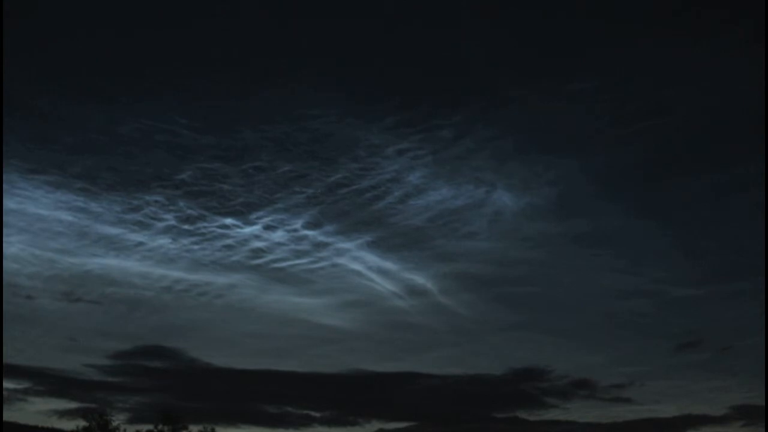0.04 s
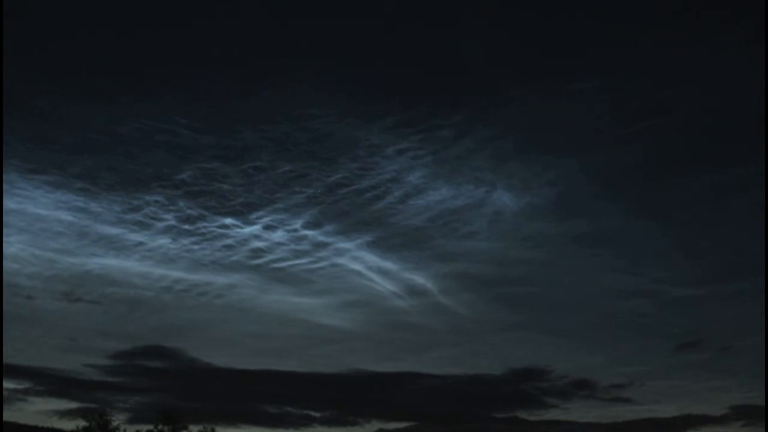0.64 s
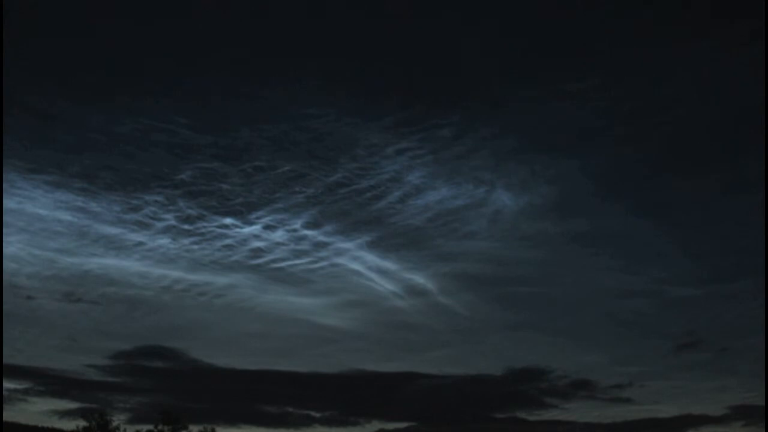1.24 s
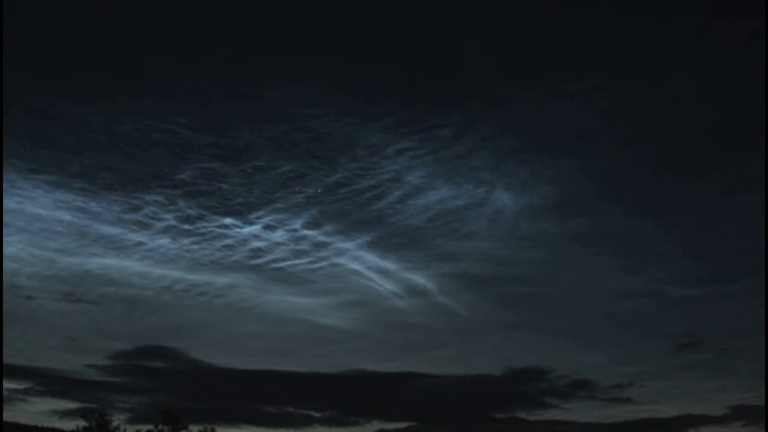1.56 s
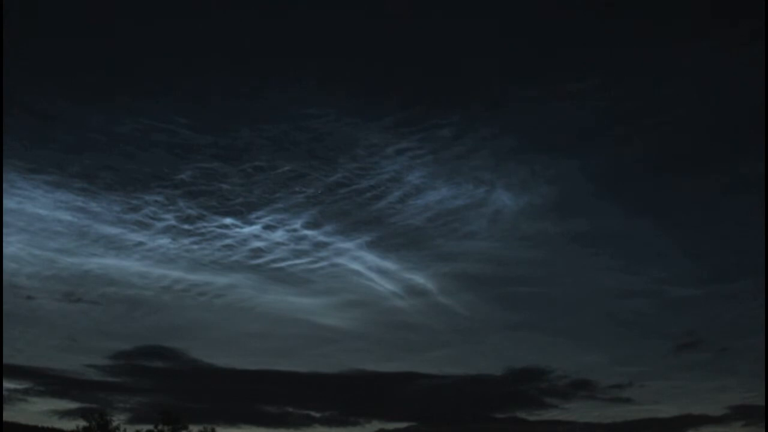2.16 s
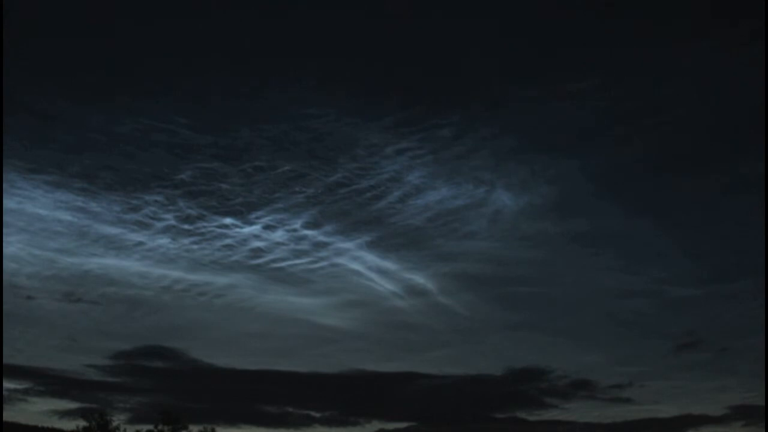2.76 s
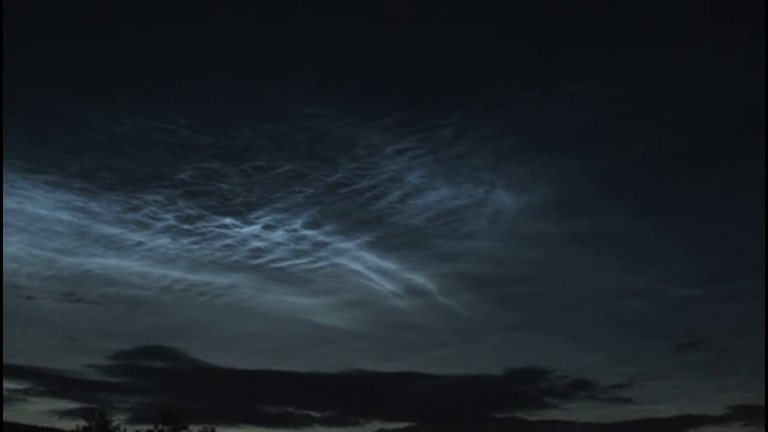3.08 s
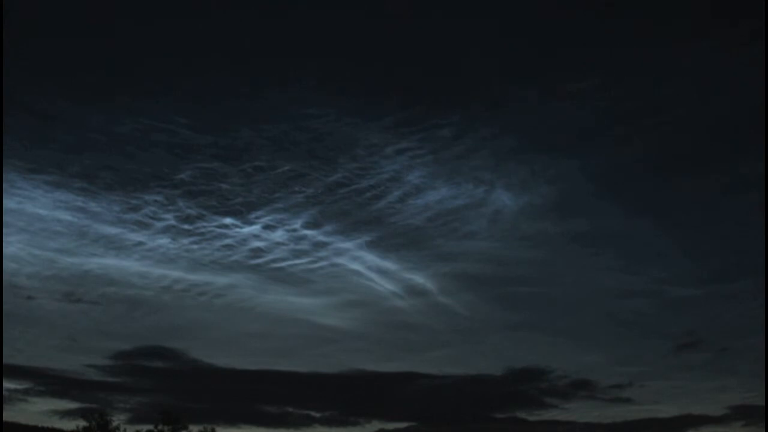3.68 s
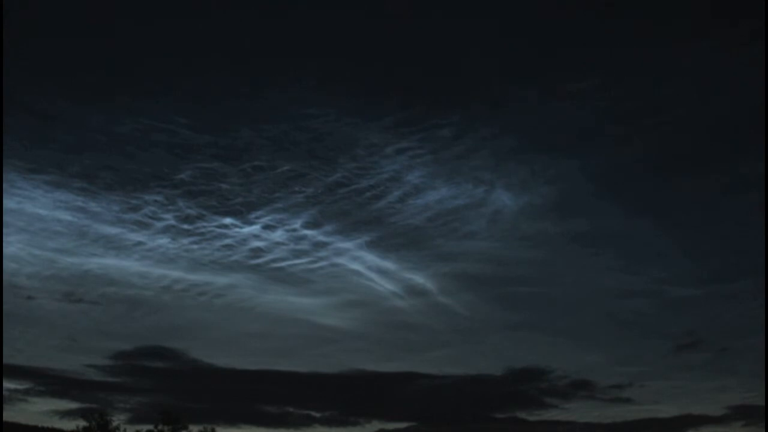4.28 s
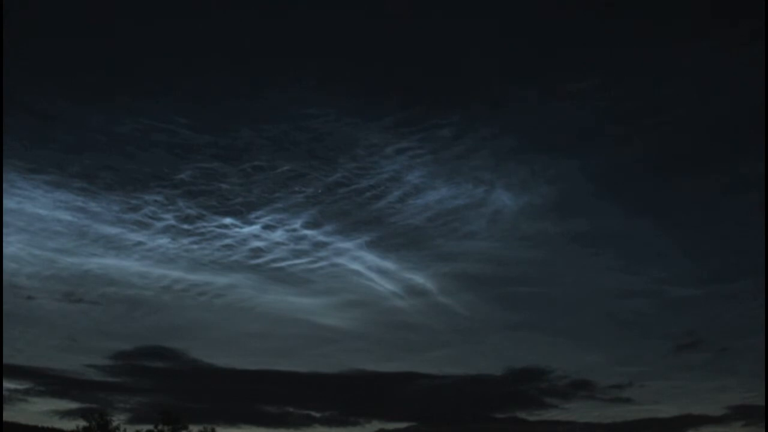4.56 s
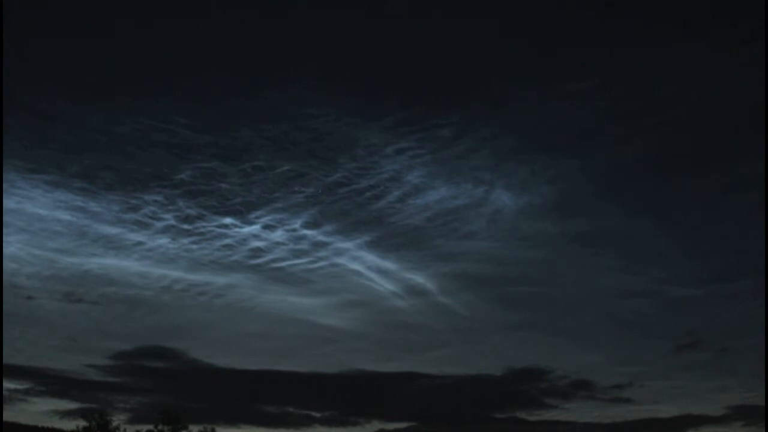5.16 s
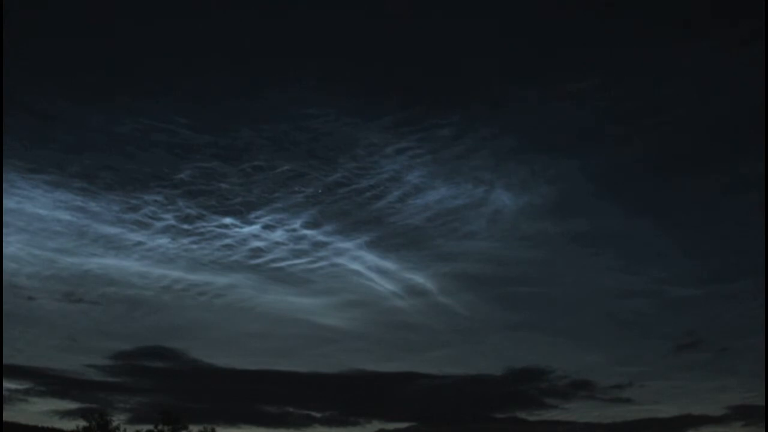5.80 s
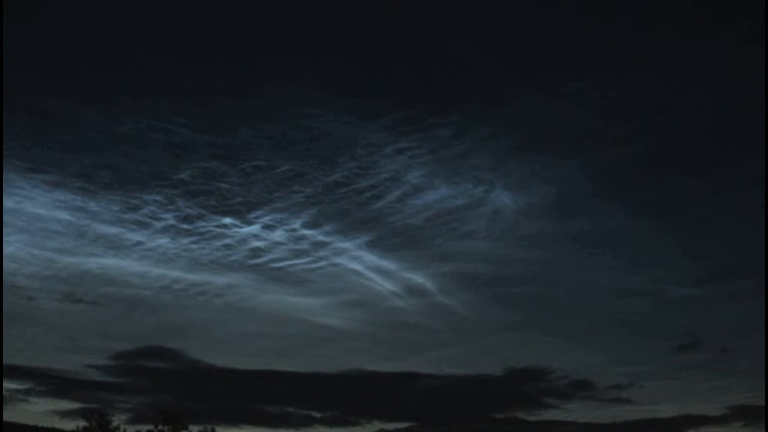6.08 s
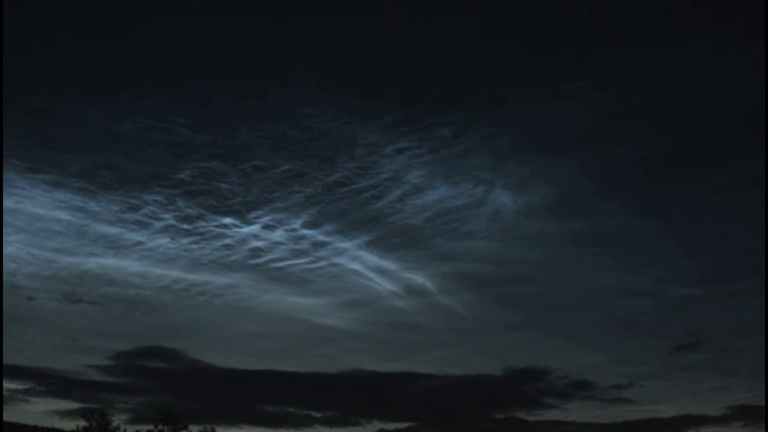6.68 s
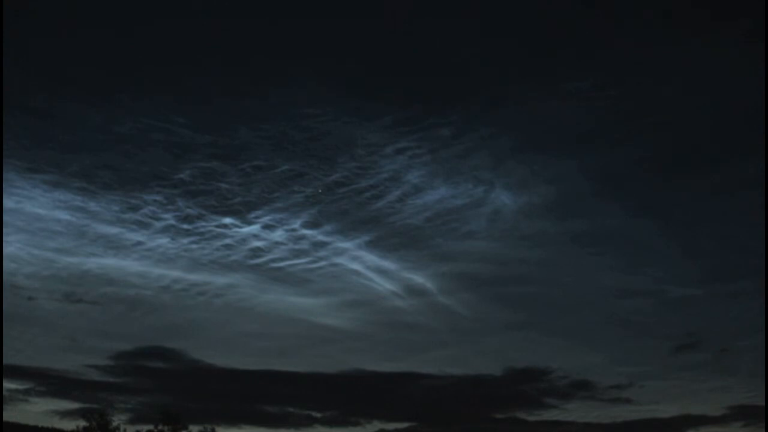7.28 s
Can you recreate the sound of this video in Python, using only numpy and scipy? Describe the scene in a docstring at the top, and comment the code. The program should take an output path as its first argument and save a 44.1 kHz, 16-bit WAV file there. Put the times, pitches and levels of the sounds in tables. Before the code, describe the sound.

A wading bird pipes in flight over open ground at dusk, starting at once and fairly close. Each call is a sharp, high whistle about a tenth of a second long, jumping up from a lower note and then sagging. The calls come roughly twice a second, from near the centre and slightly right. The first five, up to about 2 seconds, are the loudest, with faint echoes and a thin lingering wash from the landscape. Between 2 and 4 seconds they fade quickly as the bird flies away, growing duller and more blurred. From 4 seconds to the end, just past 7, they continue very faintly. A second, distant bird answers with similar faint calls between about 1 and 5.5 seconds. A soft, wide, steady hiss and a faint low hum lie underneath throughout.

```python
"""An oystercatcher pipes 'kleep' as it flies off over open ground at dusk.
Each call is a harmonic whistle from the syrinx: a low note breaks upward into an arch, which sags
and collapses. Distance dulls and blurs the calls. The surroundings scatter them back, far obstacles
return faint echoes and a second bird answers from afar. Underneath lie a soft hiss and a faint hum."""
import sys
import numpy as np
from scipy import signal
from scipy.fft import rfft, irfft
from scipy.io import wavfile
from scipy.ndimage import map_coordinates

SR = 44100
rng = np.random.default_rng(int(sys.argv[2]) if len(sys.argv) > 2 else 0)


def unload_wav(signal):
    """Save mono or channel-first audio to the path in sys.argv[1] as 16-bit WAV at rate SR, clipped to [-1, 1]."""
    wavfile.write(
        sys.argv[1],
        SR,
        np.round(np.clip(np.atleast_2d(signal).T, -1, 1) * 32767).astype(np.int16),
    )


N = 323694
TIME_S = np.arange(N) / SR
LEAD_SAMPLES = SR // 2   # run-in, so a call can begin right at the start

# Hiss spectra, in phase and opposed between the channels. Each row: frequency in Hz, relative density in dB.
HISS_MID_SPECTRUM = [(20, -11), (45, -0.5), (130, 1.5), (300, -2.5), (800, -1.4), (1400, -1.55),
                     (2000, -6.5), (3600, -11.5), (5000, -15), (7500, -19.5), (10000, -18.5), (13000, -15),
                     (15500, -18)]
HISS_SIDE_SPECTRUM = [(20, -6), (45, -2), (130, 1.5), (300, 1), (800, -1.5), (1400, -1.5), (2000, -6),
                      (3000, -9), (3600, -11), (5000, -14.5), (7500, -20), (10000, -19), (13000, -17),
                      (15500, -19)]
# Hum tones. Each entry: frequency in Hz in the first list, rms level in dB in the second.
HUM_TONES_HZ = [90, 100, 160]
HUM_LEVELS_DB = [-75.5, -68.5, -72]
# Colour of scattered sound. Each row: frequency in Hz, gain in dB.
SCATTER_SPECTRUM = [(1500, 1), (2400, -0.5), (3150, 0), (4700, 0.5), (5600, -2), (6300, 2), (8000, 0),
                    (9400, -3), (13000, -20)]
# Echoes from obstacles. Each row: delay in seconds, gain in dB.
OBSTACLE_ECHOES = [(0.096, -14.5), (.565, -25), (0.9, -34)]
# Second bird. Each row: time of the break in seconds, top pitch in Hz, relative level in dB.
ANSWER_CALLS = [(1.10, 3230, -55), (1.494, 3176, -58), (2.042, 3165, -56.5), (2.566, 3190, -63),
                (2.985, 3194, -61), (4.19, 3260, -64.5), (5.42, 3120, -62.5)]
# Main bird. Each row: time of the break in seconds, top pitch in Hz, low note length in seconds,
# arch length in seconds, level in dB, low note offset in dB, arch overtone offset in dB.
FLIGHT_CALLS = [ (0.0391, 3198, 0.022, 0.07, -23.5, -0.5, -0.5),
                (0.4225, 3170, 0.025, 0.064, -20.5, -3.5, 0.5), (.794, 3082, .026, 0.069, -21.5, -5, 1),
                (1.182, 3051, 0.027, 0.068, -23.5, -4.5, 0.5), (1.7519, 3030, .024, 0.075, -25, -4.5, 0.5),
                (2.2986, 3064, 0.026, 0.073, -31, -4, 5), (2.7297, 3052, .029, 0.075, -38, -5, 0),
                (3.179, 3018, 0.0269, 0.08, -46.5, -4, 4.5), (3.61, 3010, 0.031, 0.061, -51, -2.5, 1.5),
                (4.0, 3060, 0.03, .085, -58, 1.5, 5), (4.377, 3110, 0.032, 0.086, -58, -2, 5),
                (4.792, 3067, 0.0279, 0.077, -55, -2, -4), (5.202, 3080, 0.026, 0.074, -55.5, -1.5, 3),
                (5.682, 2970, 0.029, 0.081, -59.5, -3, 3), (6.152, 3033, 0.03, 0.072, -60.5, -4, 3),
                (6.654, 3040, 0.027, 0.059, -59.5, -3, 0), (7.13, 3020, 0.025, 0.1, -61, -1, 0)]
# Its bearing. Each row: time in seconds, right ear lag in seconds, left minus right in dB below 7 kHz,
# the same above 7 kHz.
FLIGHT_BEARING = [(0, 2.1e-5, -0.5, 0), (.45, 1e-5, -0.5, 1.9), (.8, 3e-6, -2, 10), (1.2, -4e-6, -3, 7.5),
                  (2.3, -1.2e-5, -2.5, 7.5), (3.6, -1.5e-5, -2, 2)]
# Harmonics 2 to 5 of low note and arch, close by. Each entry: base level in dB re the fundamental.
LOW_HARMONICS_DB = [-9.5, -14.5, -24.5, -26]
ARCH_HARMONICS_DB = [-7, -9, -19, -33]

HALF_CALL_S = 0.1   # call buffer on each side of the break
TOP_AT, COLLAPSE_AT = 0.2544, 0.81   # shares of the arch length


def from_db(db):
    """Decibels to gain."""
    return 10 ** (np.asarray(db) / 20)


def unit_rms(x):
    """Scale to unit rms."""
    return x / np.sqrt(np.mean(x ** 2) + 1e-20)


def coloured(x, spectrum):
    """Filter by a (Hz, dB) curve."""
    hz, db = np.transpose(spectrum)
    bins_hz = np.maximum(np.fft.rfftfreq(x.shape[-1], 1 / SR), 1)
    return irfft(rfft(x) * from_db(np.interp(np.log(bins_hz), np.log(hz), db)), x.shape[-1])


def drift(rate_hz, size):
    """Smooth random wander, unit rms."""
    lowpass = signal.butter(2, rate_hz, fs=SR, output="sos")
    return unit_rms(signal.sosfilt(lowpass, rng.standard_normal(size + SR))[SR:])


def delayed(x, delay_s):
    """Delay both channels."""
    return np.pad(x, ((0, 0), (round(delay_s * SR), 0)))[:, :x.shape[1]]


def add_call(track, call, break_s):
    """Mix a call into a track that begins with the run-in."""
    at = max(round((break_s - HALF_CALL_S) * SR) + LEAD_SAMPLES, 0)
    track[at:at + len(call)] += call[:len(track) - at]


def hiss(mid_db=-55.5, side_db=-53.5):
    """Steady, wide noise."""
    mid = from_db(mid_db) * unit_rms(coloured(rng.standard_normal(N), HISS_MID_SPECTRUM))
    side = from_db(side_db) * unit_rms(coloured(rng.standard_normal(N), HISS_SIDE_SPECTRUM))
    return mid + side * [[1], [-1]]


def hum(waver=0.13, wander_rad=0.32):
    """Low tones, wavering slightly in level and phase."""
    total = np.zeros(N)
    for hz, db in zip(HUM_TONES_HZ, HUM_LEVELS_DB):
        tone = np.sqrt(2) * np.sin(2 * np.pi * hz * TIME_S + wander_rad * drift(0.87, N))
        total += from_db(db) * (1 + waver * drift(4.5, N)) * tone
    return total


def scattered(x, t60_s, rise_s, coherence, air_loss_db):
    """Countless small reflections build up and die away; air loss is given at 6 kHz."""
    t = np.arange(3 * SR) / SR
    mid, side = rng.standard_normal((2, len(t)))
    reflections = np.sqrt(1 + coherence) * mid + np.sqrt(1 - coherence) * side * [[1], [-1]]
    envelope = from_db(-60 * t / t60_s) * (1 - np.exp(-t / rise_s))
    response = coloured(unit_rms(reflections * envelope) / np.sqrt(len(t)), SCATTER_SPECTRUM)
    response = coloured(response, [(3000, 0), (6000, -air_loss_db), (12000, -4 * air_loss_db)])
    return signal.fftconvolve(x[None], response, axes=1)[:, :LEAD_SAMPLES + N]


def landscape(near, far, ground_delay_s=0.012, swell_db=3.5):
    """Short tail from nearby ground, dull echoes from obstacles, long wash that swells and ebbs."""
    tail = scattered(near, t60_s=0.36, rise_s=0.00081, coherence=0.91, air_loss_db=0.2)
    smeared = scattered(near, t60_s=0.13, rise_s=0.0012, coherence=0.81, air_loss_db=7.0)
    echoes = sum(from_db(db) * delayed(smeared, delay_s) for delay_s, db in OBSTACLE_ECHOES)
    wash = scattered(far, t60_s=6.0, rise_s=0.11, coherence=0.8, air_loss_db=5.5)
    wash *= from_db(swell_db * drift(13.0, LEAD_SAMPLES + N))
    return (delayed(tail, ground_delay_s) + echoes + wash)[:, LEAD_SAMPLES:]


def low_note(t, low_s, bend_s=0.0016, scoop_s=0.0025, swell_db=8.5):
    """Slides in from below, swells, bends up into the break. Returns pitch re the top, gain in dB."""
    progress = np.clip(1 + t / low_s, 0, 1)
    scoop = 0.033 * np.exp(-abs(t + low_s) / scoop_s)
    bend = 0.07 * np.exp(-abs(t) / bend_s)
    return 0.735 + 0.0544 * progress + bend - scoop, swell_db * (progress - 0.5)


def arch(t, arch_s, scoop_s=0.0058, collapse_s=0.0017, db_per_drop=41.5, collapse_db=1.5):
    """Scoops up, sags ever faster, collapses; level follows. Returns pitch re the top, gain in dB."""
    scoop = 0.047 * np.exp(-abs(t) / scoop_s)
    sag = 0.33 * np.clip((t / arch_s - TOP_AT) / (1 - TOP_AT), 0, 1) ** 2.25
    collapse = 0.5 + 0.5 * np.tanh((t - COLLAPSE_AT * arch_s) / collapse_s)
    drop = scoop + sag + 0.116 * collapse
    return 1 - drop, 0.2 - db_per_drop * drop - collapse_db * collapse


def gesture(t, low_s, arch_s, break_s=0.001, attack_s=0.0031, release_s=0.0055):
    """Register break from low note to arch at t = 0. Returns pitch re the top, gain, low note share."""
    low_pitch, low_db = low_note(t, low_s)
    arch_pitch, arch_db = arch(t, arch_s)
    in_low = np.clip(0.5 - t / break_s, 0, 1)
    pitch = in_low * low_pitch + (1 - in_low) * arch_pitch
    gain = from_db(in_low * low_db + (1 - in_low) * arch_db)
    gate = np.clip(0.5 + (t + low_s) / attack_s, 0, 1) * np.clip((arch_s - t) / release_s, 0, 1)
    return pitch, gate * gain, in_low


def syrinx_cracks(t, low_s, arch_s, band_hz=(2200, 8000), level_db=-23, end_boost_db=3):
    """The syrinx cracks briefly at onset, register break and collapse."""
    at_onset = np.exp(-((t + low_s) / 0.003) ** 2)
    at_break = np.exp(-((t + 0.001) / 0.0025) ** 2)
    at_collapse = from_db(end_boost_db) * np.exp(-((t - COLLAPSE_AT * arch_s) / 0.0081) ** 2)
    bandpass = signal.butter(2, band_hz, "band", fs=SR, output="sos")
    rasp = unit_rms(signal.sosfilt(bandpass, rng.standard_normal(len(t))))
    return from_db(level_db) * (at_onset + at_break + at_collapse) * rasp


def kleep(top_hz, low_s, arch_s, low_db, overtones_db, remoteness,
          jitter=0.0042, flutter_db=2.0, air_db=4, beak_hz=6500, break_dip_db=6, sag_dip_db=9):
    """One harmonic whistle from the syrinx, centred on its break. Remoteness: 0 close, 1 far."""
    t = np.arange(-HALF_CALL_S * SR, HALF_CALL_S * SR) / SR
    pitch, envelope, in_low = gesture(t, low_s, arch_s)
    in_arch = 1 - in_low
    drop = in_arch * (1 - pitch)
    phase = 2 * np.pi * np.cumsum(top_hz * pitch * (1 + jitter * drift(450, len(t)))) / SR
    # flutters over a long path, grows ragged as the arch collapses
    ragged_db = (0.21 + flutter_db * remoteness + 9 * drop) * drift(267, len(t))
    gain = envelope * from_db(low_db * in_low + ragged_db)
    # overtones dip at the break and halfway down the arch
    dip_db = break_dip_db * np.exp(-(t / 0.004) ** 2)
    dip_db += sag_dip_db * in_arch * np.exp(-((pitch - 0.83) / 0.1) ** 2)
    voice = np.sin(phase)
    for k, (arch_db, opening_db) in enumerate(zip(overtones_db, LOW_HARMONICS_DB), 2):
        air_loss_db = air_db * remoteness * (2 * k - 3)
        fade_db = drop * (50 * max(k * top_hz / beak_hz - 1, 0) + 20 * remoteness)   # highest first
        db = in_low * (opening_db - air_loss_db) + in_arch * arch_db - dip_db - fade_db
        voice += from_db(db + drift(130, len(t))) * np.sin(k * phase)
    return np.sqrt(2) * gain * (voice + syrinx_cracks(t, low_s, arch_s))


def answering_bird(direct_db=-4, blur_db=-3):
    """Distant calls: air nearly strips the arch of overtones, the long path blurs them."""
    track = np.zeros(LEAD_SAMPLES + N)
    for break_s, top_hz, db in ANSWER_CALLS:
        call = kleep(top_hz, low_s=0.025, arch_s=0.087, low_db=-1.5,
                     overtones_db=[-24, -40, -55], remoteness=0.67)
        add_call(track, from_db(db) * call, break_s)
    blur = scattered(track, t60_s=0.15, rise_s=0.0025, coherence=0.6, air_loss_db=2)
    return (from_db(direct_db) * track + from_db(blur_db) * blur)[:, LEAD_SAMPLES:]


def from_bearing(x, split_hz=7000):
    """Left and right differ slightly in arrival time, and in level mostly in the treble."""
    times_s, *columns = np.transpose(FLIGHT_BEARING)
    lag_s, low_db, high_db = [np.interp(TIME_S, times_s, column) for column in columns]
    low = signal.sosfiltfilt(signal.butter(2, split_hz, fs=SR, output="sos"), x)
    sides = np.array([[0.5], [-0.5]])
    left, right = low * from_db(sides * low_db) + (x - low) * from_db(sides * high_db)
    return np.array([left, map_coordinates(right, [np.arange(N) - lag_s * SR], order=5)])


def flying_bird(nearest_m=12.7, speed_m_per_s=13.05, remote_m=89, ground_db=-32.5, far_db=-47):
    """Straight flight, nearest at the start. Returns calls at the listener, near ground and far land."""
    direct, near, far = np.zeros((3, LEAD_SAMPLES + N))
    air_db_per_m = 0.1244 * (1 + np.arange(len(ARCH_HARMONICS_DB))) ** 2.25
    for break_s, top_hz, low_s, arch_s, db, low_db, bright_db in FLIGHT_CALLS:
        distance_m = np.hypot(nearest_m, speed_m_per_s * break_s)
        remoteness = min(distance_m / remote_m, 1) ** 2
        overtones_db = np.array(ARCH_HARMONICS_DB) + bright_db - air_db_per_m * (distance_m - nearest_m)
        call = kleep(top_hz, low_s, arch_s, low_db, overtones_db, remoteness)
        add_call(direct, from_db(db) * call, break_s)
        add_call(near, from_db(ground_db) * (nearest_m / distance_m) ** 2.24 * call, break_s)
        add_call(far, from_db(far_db + 0.22 * db) * call, break_s)   # barely falls with distance
    return direct[LEAD_SAMPLES:], near, far


def scene():
    """Two birds in open landscape, over hiss and hum."""
    direct, near, far = flying_bird()
    return from_bearing(direct) + answering_bird() + landscape(near, far) + hiss() + hum()


def record(dry, notch_hz=11230, cutoff_hz=15800):
    """Recorder response: narrow treble notch, steep low-pass."""
    notched = signal.lfilter(*signal.iirnotch(notch_hz, Q=20, fs=SR), dry)
    return signal.sosfilt(signal.ellip(12, 0.2, 70, cutoff_hz, fs=SR, output="sos"), notched)


dry = scene()
out = record(dry)
unload_wav(out)
```